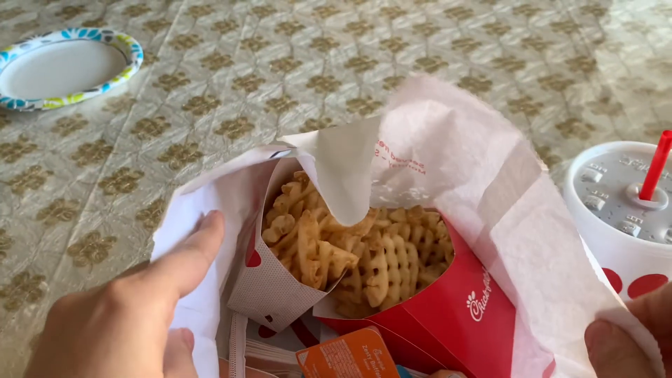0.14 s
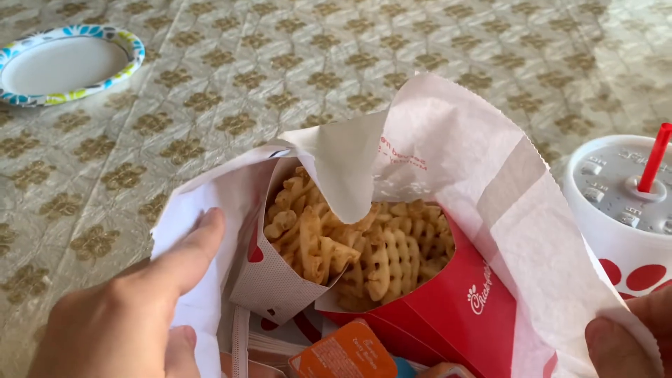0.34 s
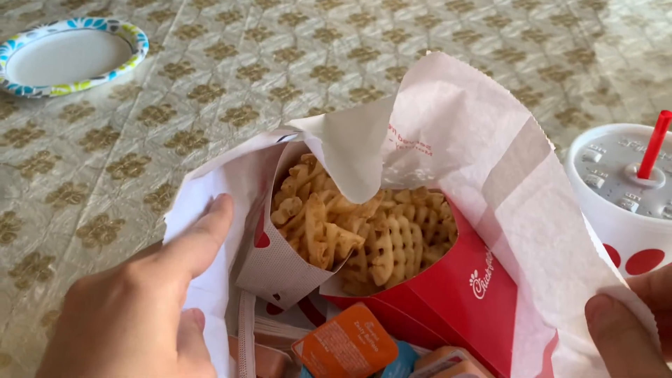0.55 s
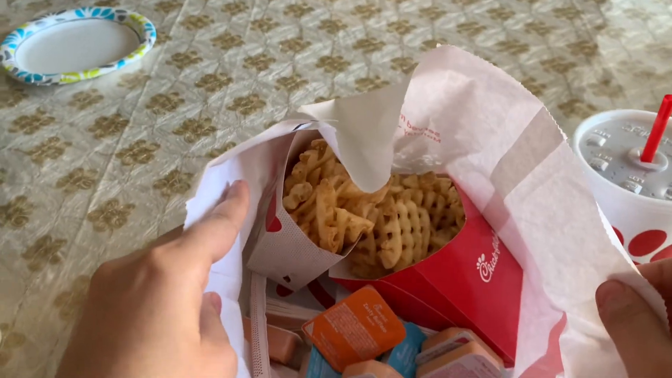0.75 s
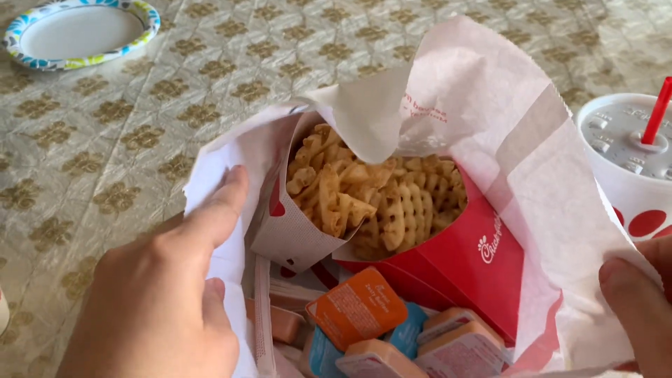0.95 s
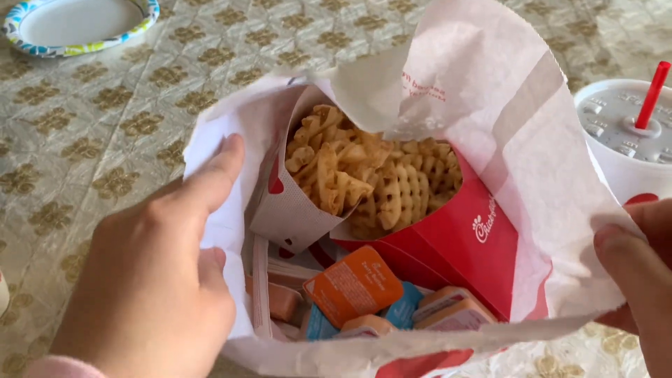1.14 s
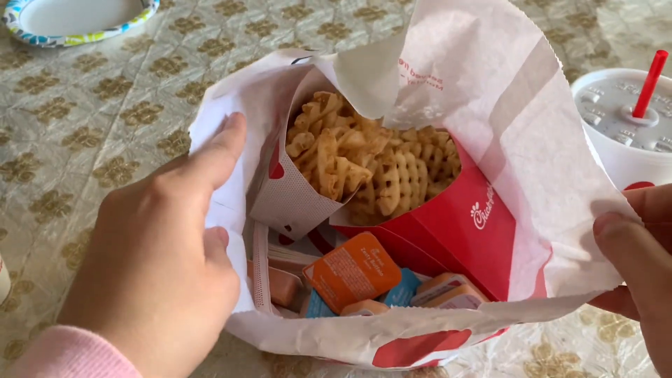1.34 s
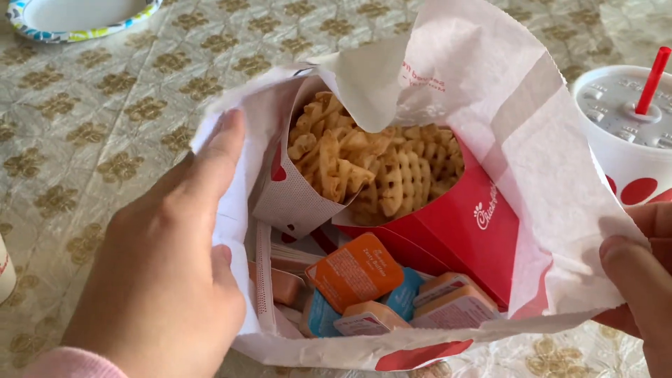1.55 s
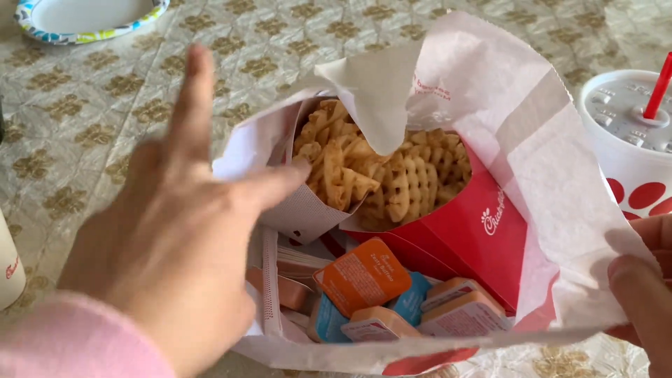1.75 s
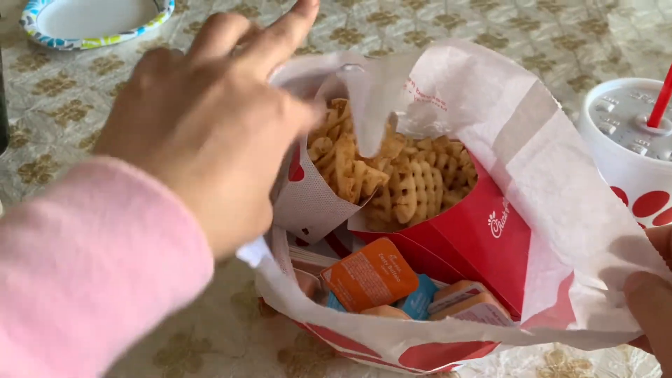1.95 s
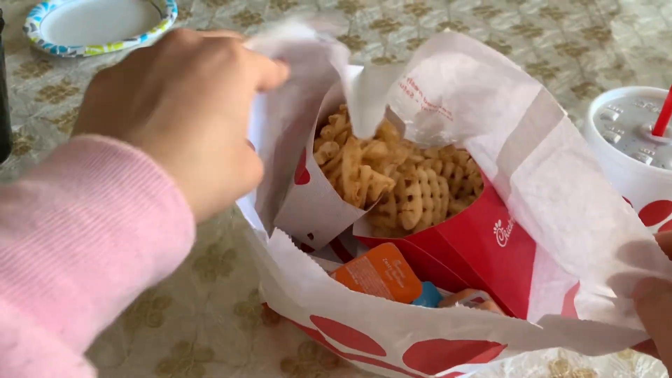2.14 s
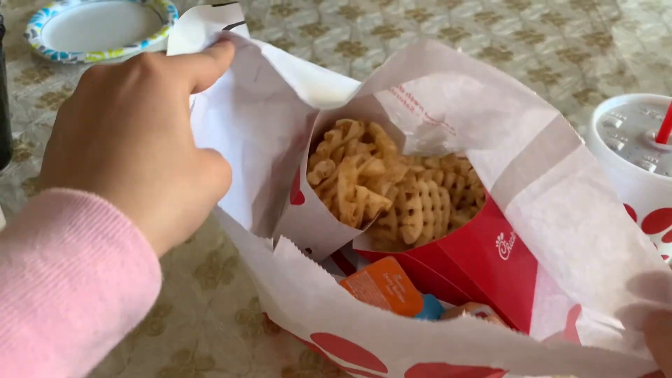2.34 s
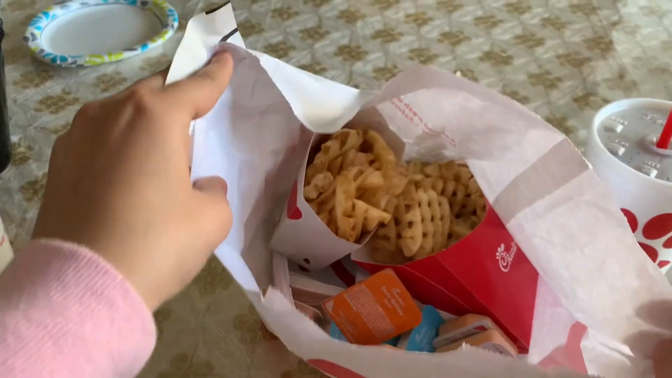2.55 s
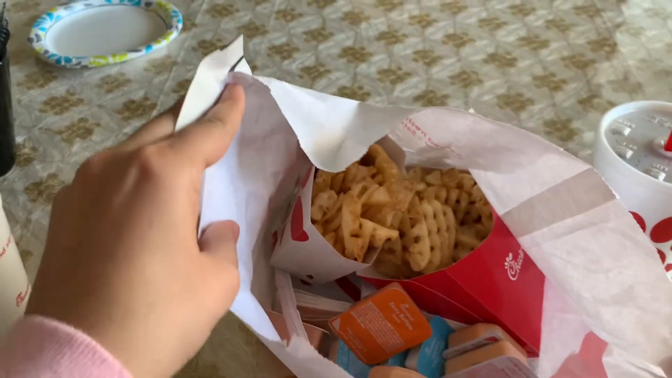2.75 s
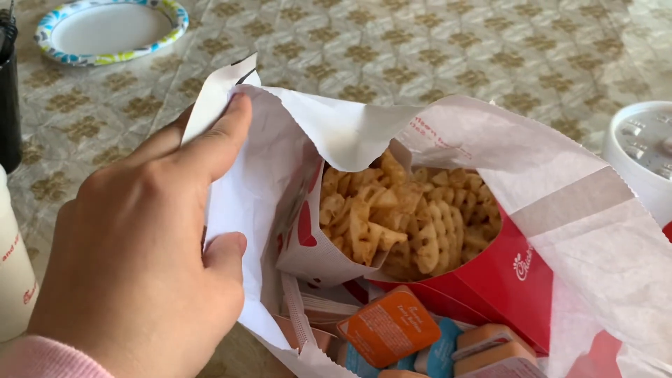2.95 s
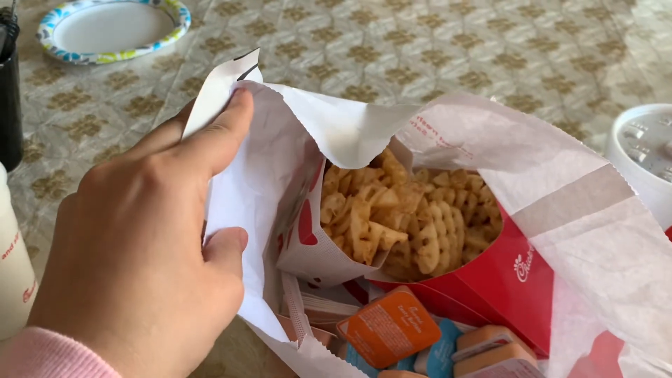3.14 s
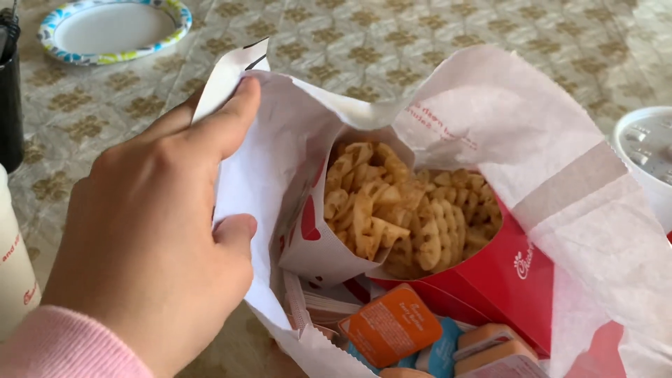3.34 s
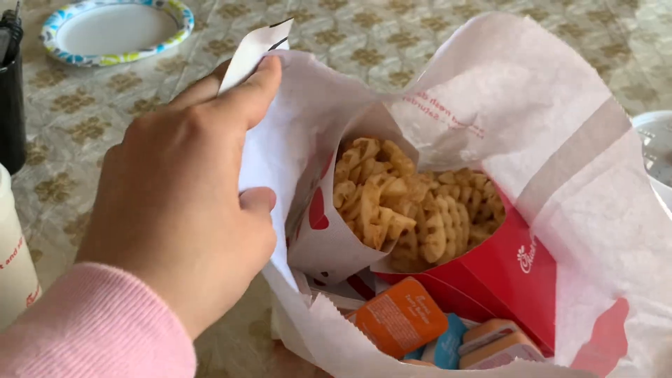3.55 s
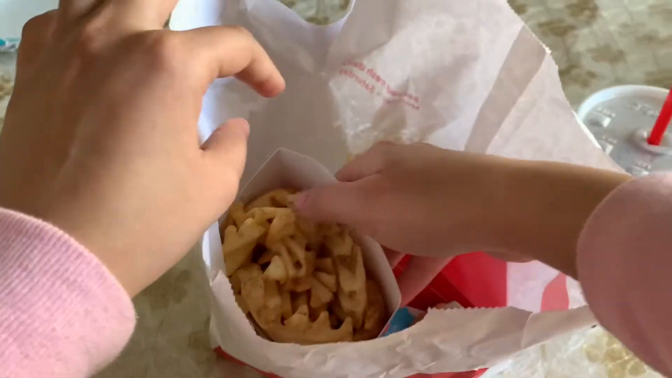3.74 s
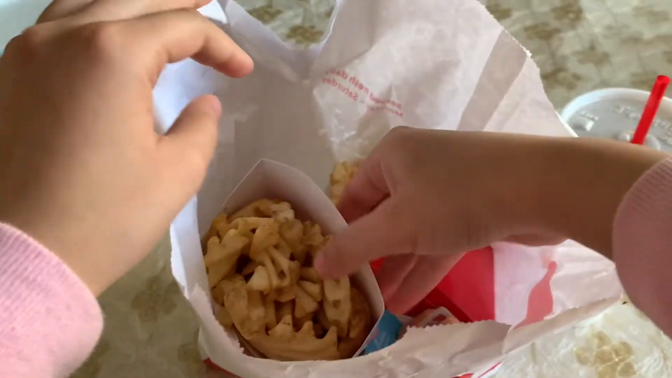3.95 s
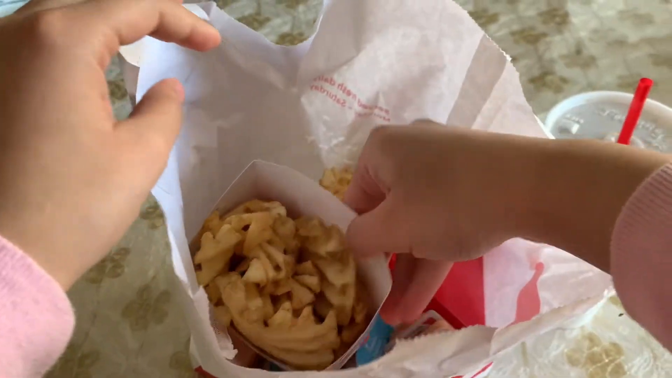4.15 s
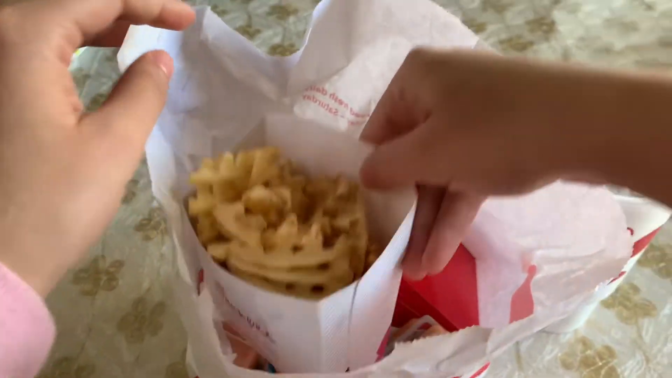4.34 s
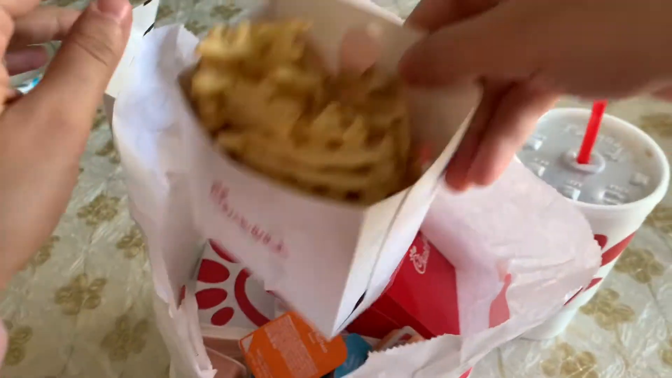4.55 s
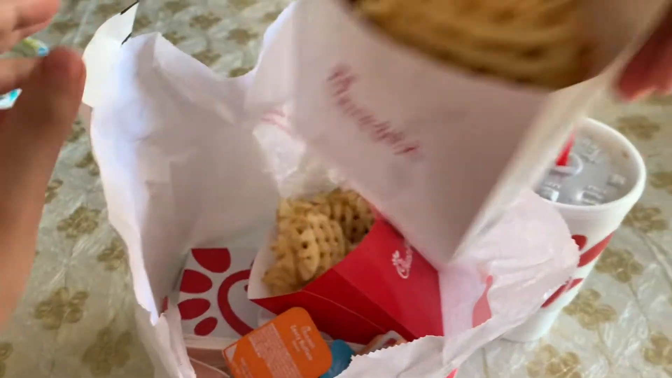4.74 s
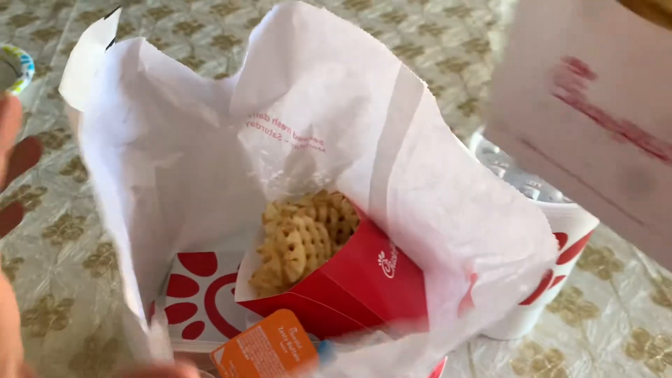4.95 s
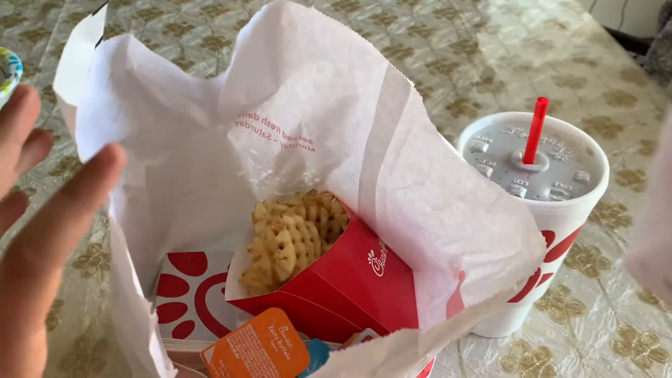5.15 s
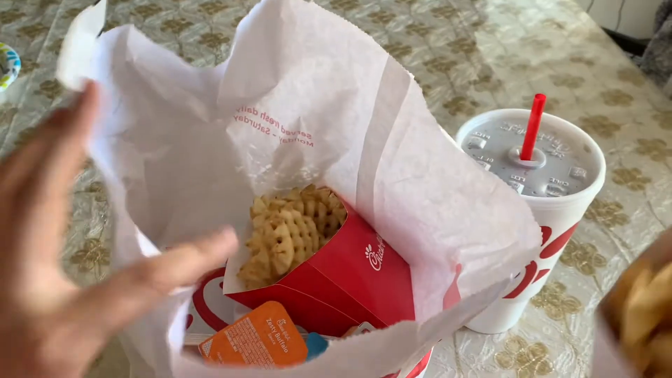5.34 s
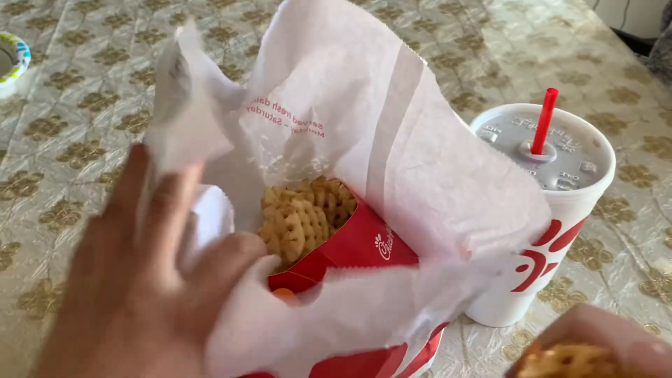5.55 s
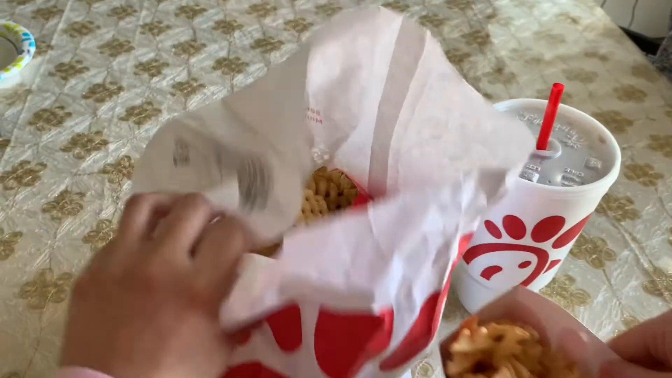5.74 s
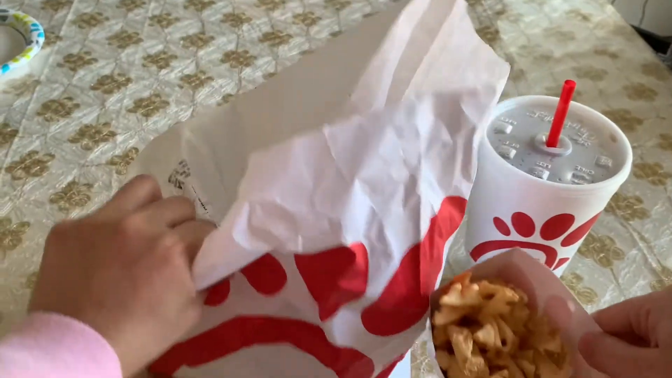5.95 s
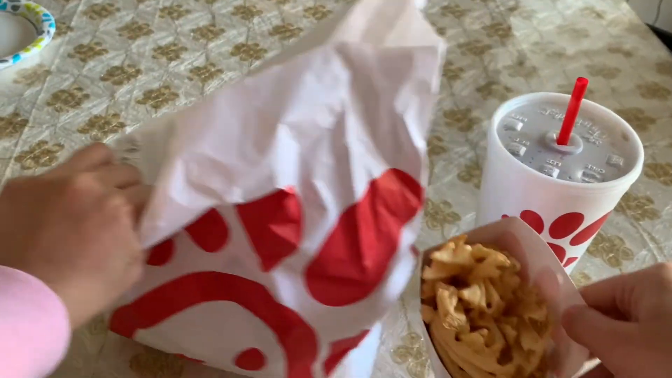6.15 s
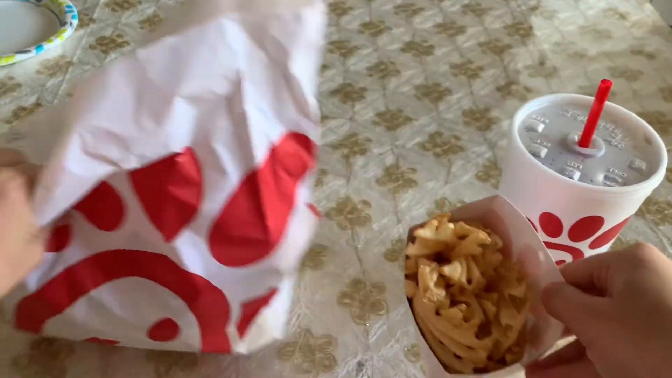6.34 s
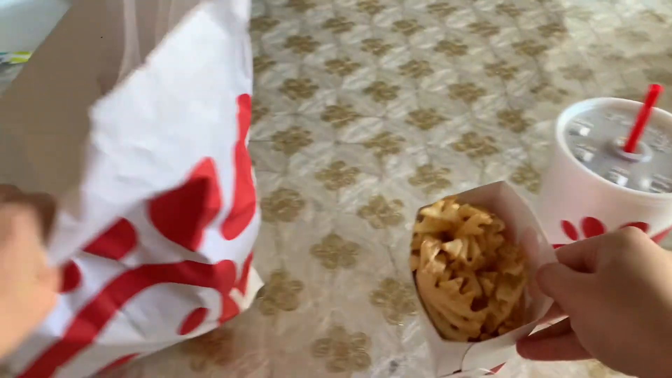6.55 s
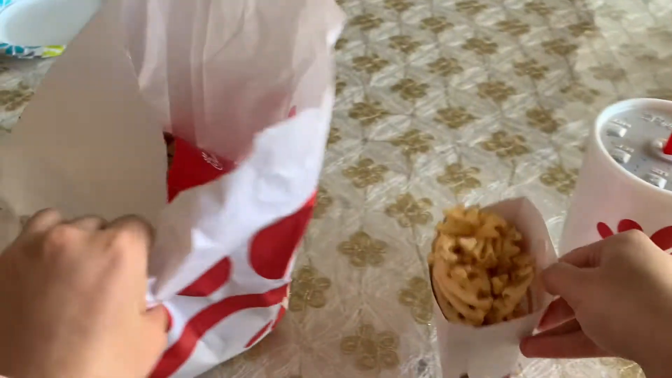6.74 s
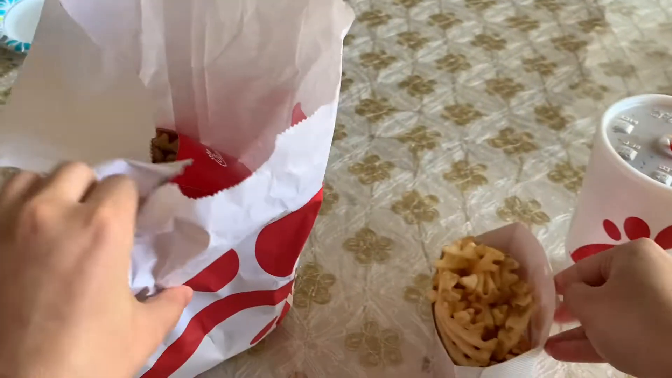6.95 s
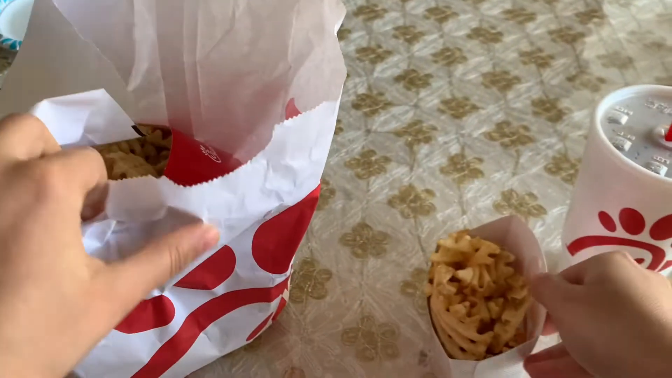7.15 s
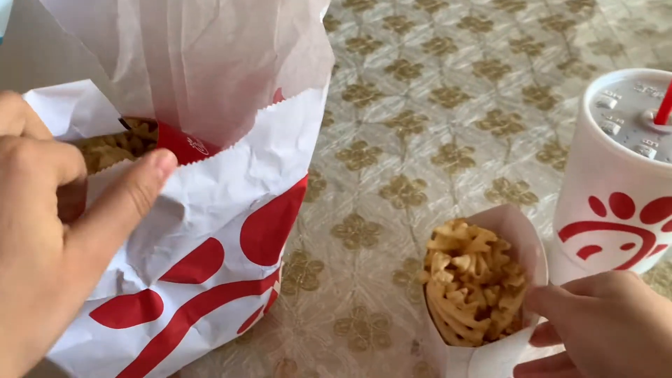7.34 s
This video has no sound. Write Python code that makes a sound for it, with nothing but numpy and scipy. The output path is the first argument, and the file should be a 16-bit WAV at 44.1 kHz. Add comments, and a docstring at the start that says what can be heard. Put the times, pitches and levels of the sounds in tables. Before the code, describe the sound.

A paper takeout bag is opened by hand, close to the microphone in a quiet, slightly reverberant room. Gentle rustling leads to a strong crackling tug, then scattered pops and rubs. A stiff carton is drawn out with a brief dull scrape and soft taps. After a lull the bag is seized and dragged, crunching and snapping loudly before easing to light rustles over faint room hum.

```python
"""A small room with a low hum, where hands open a paper takeout bag on a table close to a stereo microphone.
They slide a carton of fries out and drag the bag aside. Showers of tiny ringing cracks make the rustle,
with smooth noise for paper rubbing on paper; noise bursts and short resonances make the snaps, pops and thuds.
Resonated noise makes the carton's drag and taps; decaying noise makes the reverb, a wavering sine the hum."""
import sys
import numpy as np
from scipy import signal
from scipy.fft import rfft, irfft, next_fast_len
from scipy.io import wavfile
from scipy.ndimage import map_coordinates

SR = 44100
rng = np.random.default_rng(int(sys.argv[2]) if len(sys.argv) > 2 else 0)


def bounce(signal):
    """Save signal as a 16-bit WAV file at the path given by the first command-line argument."""
    frames = np.transpose(np.atleast_2d(signal))
    limited = np.clip(frames, -1, 1)
    pcm = np.round(limited * 32767).astype(np.int16)
    wavfile.write(sys.argv[1], SR, pcm)


N = 330309
LEAD_IN = .012  # s in which a burst may swell before its peak

# tone of flapping panels, under the rustle and under each snap: (frequency [Hz], gain [dB])
FLAP_TONE = [(25, -21), (60, 1.5), (180, -5), (350, -2), (500, -5), (700, -8.5), (1400, -11), (4000, -63.5)]


def amp(db):
    """Decibels to gain."""
    return 10 ** (np.asarray(db) / 20)


def unit(x):
    """x at rms 1."""
    return x / np.sqrt(np.mean(x ** 2) + 1e-20)


def peaked(x):
    """x with a peak of 1, taken as the mean of both rows' peaks."""
    return x / np.abs(x).max(axis=1).mean()


def along(points, hz):
    """(Hz, value) points read on a log frequency axis."""
    f, v = np.transpose(points)
    return np.interp(np.log(hz + 1), np.log(f), v)


def wobble(rate):
    """A smooth random curve, rate knots a second."""
    knots = rng.standard_normal(int(N * rate / SR) + 4)
    return map_coordinates(knots, [np.arange(N) * rate / SR])


def filtered(x, response):
    """x times a complex response of frequency."""
    m = next_fast_len(N + 8192)
    hz = np.fft.rfftfreq(m, 1 / SR)
    return irfft(rfft(x, m) * response(hz), m)[..., :N]


def coloured(x, spectrum, size=4096):
    """x through a causal minimum-phase filter with the given spectrum."""
    gain = amp(along(spectrum, np.fft.rfftfreq(size, 1 / SR)))
    cepstrum = irfft(np.log(gain))
    # folding the cepstrum onto positive time puts the energy as early as it can go
    cepstrum[1:size // 2] *= 2
    cepstrum[size // 2 + 1:] = 0
    impulse = irfft(np.exp(rfft(cepstrum)))
    return signal.fftconvolve(x, impulse[None], axes=1)[:, :x.shape[1]]


def ringing(x, hz, q):
    """x through one resonance."""
    w = 2 * np.tan(np.pi * min(hz / SR, .4))
    b, a = signal.bilinear([w / q, 0], [1, w / q, w * w])
    return signal.lfilter(b, a, x)


def burst(attack, t60, size=4096):
    """Two unrelated noises that swell up to the end of the lead-in and then die away."""
    t = np.arange(size) / SR - LEAD_IN
    swell = np.exp(np.minimum(t, 0) / attack)
    decay = amp(-60 * np.maximum(t, 0) / t60)
    return rng.standard_normal((2, size)) * swell * decay


def add(track, s, sound):
    """Lay a sound into a track at a time in seconds."""
    part = track[:, max(round(s * SR), 0):][:, :sound.shape[1]]
    part += sound[:, :part.shape[1]]


def handling():
    """Flapping and sliding levels in dB; every move swells and fades, and overlapping moves add in power."""
    # hand moves on the bag: (time of the height [s], swell [s], fade [s], flap level [dB], slide level [dB])
    hand_moves = [(0.01, .3, 0.28, -42, -52.5), (0.499, 0.37, 0.54, -47.5, -73),
                  (0.89, 0.25, 0.47, -55.5, -60), (1.5, 0.23, 0.26, -44.5, -58),
                  (1.759, 0.31, 0.53, -44.5, -47), (1.894, 0.099, .1, -31, -41.5),
                  (2.11, 0.076, 0.15, -31.5, -29.5), (2.481, 0.39, 0.39, -42, -50),
                  (3.33, 0.27, .33, -52.5, -59), (3.533, 0.2, 0.037, -38.5, -42),
                  (3.63, 0.023, 0.45, -54.5, -54), (4.058, 0.09, 0.43, -48.5, -54.5),
                  (4.345, 0.36, 0.037, -55.5, -47), (4.906, 0.016, 0.073, -35.5, -33.5),
                  (5.319, 0.054, 0.63, -45, -43.5), (5.487, 0.097, 0.036, -33, -24),
                  (5.6, 0.2, 0.36, -30.5, -33.5), (5.731, 0.1, 0.083, -25, -25),
                  (5.899, 0.17, 0.3, -24.5, -25.5), (6.429, 0.16, 0.11, -28, -36.5),
                  (6.55, 0.096, 0.11, -31, -37.5), (6.758, 0.81, 0.48, -38, -40),
                  (7.402, 0.19, 0.11, -48.5, -43.5)]
    swing_db = 20  # a move gains this much over its swell and loses it over its fade
    t = np.arange(N) / SR
    power = np.zeros((2, N))
    for s, swell, fade, flap_db, slide_db in hand_moves:
        drop_db = swing_db * np.maximum((s - t) / swell, (t - s) / fade)
        power += amp([[flap_db], [slide_db]]) ** 2 * amp(-drop_db) ** 2
    return 10 * np.log10(power + 1e-20)


def buckles(rate, low_hz, high_hz, t60, spread_db, crack, count, size):
    """Tiny buckles of uneven size, rate a second, each a noisy crack with its own few modes; rms 1."""
    draws = rng.random((int(rate * N / SR), 2 + 4 * count))
    start, strength = (draws[:, 0] * N).astype(int), draws[:, 1]
    pitch, phase = draws[:, 2:].T.reshape(2, 2, count, -1, 1).astype(np.float32)
    t = np.arange(size, dtype=np.float32) / SR
    hz = low_hz + (high_hz - low_hz) * pitch
    modes = unit(np.sin(2 * np.pi * (hz * t + phase)).sum(axis=1))
    noisy = modes + crack * rng.standard_normal(modes.shape)
    rings = noisy * (1 - np.exp(-high_hz * t)) * amp(-60 * t / t60)
    # many small ones, a few large
    rings *= amp(-spread_db * np.log(np.maximum(strength, .06)))[:, None]
    where = (start[:, None] + np.arange(size)).ravel()
    return unit(np.array([np.bincount(where, r.ravel(), N + size)[:N] for r in rings]))


def rubbed(grain, share):
    """Grain blended in power with the smooth noise of rubbing."""
    share = np.clip(share, .1, .95)
    return np.sqrt(share) * grain + np.sqrt(1 - share) * rng.standard_normal((2, N))


def rustle():
    """Moving paper: panels flap, creases crumple, and surfaces slide with a fine crinkle."""
    # tone of crumpling creases: (frequency [Hz], gain [dB])
    crumple_tone = [(300, -45), (700, -4.5), (1100, -2), (2800, 0), (4500, 0.5), (9000, -69)]
    # tone of paper sliding on paper: (frequency [Hz], gain [dB])
    slide_tone = [(1200, -23.5), (3000, 2.5), (4500, -3), (7000, 4), (11000, -2), (15500, -3.5)]
    flap_db, slide_db = handling()
    crumple_db = 0.58 * flap_db + 0.34 * slide_db  # crumpling needs both bending and sliding
    grip_db = 2.51 * wobble(40)  # the fingers move in small jerks

    panels = buckles(rate=140, low_hz=161.3, high_hz=565.4, t60=0.048,
                     spread_db=3.5, crack=1.8, count=2, size=2048)
    creases = buckles(rate=210, low_hz=662, high_hz=4575, t60=0.02,
                      spread_db=4.5, crack=1.0, count=3, size=512)
    fibres = buckles(rate=250, low_hz=1010, high_hz=15270, t60=0.016,
                     spread_db=6.0, crack=0.75, count=6, size=256)

    # hard handling buckles the paper; gentle handling rubs it more
    share = 0.85 + 0.02 * (slide_db + 42.5)
    sway = unit(coloured(rng.standard_normal((2, N)), FLAP_TONE))
    flapping = unit(unit(coloured(panels, FLAP_TONE)) + 0.38 * sway)
    crumpling = unit(coloured(rubbed(unit(creases + .5 * fibres), share), crumple_tone))
    sliding = unit(coloured(rubbed(unit(fibres + .5 * creases), share), slide_tone))

    flap = amp(flap_db - 1.5) * flapping
    crumple = amp(crumple_db - 4.5) * crumpling
    slide = amp(slide_db + 3.5) * sliding
    return amp(grip_db) * (flap + crumple + slide)


def background():
    """Low room noise, and a sine hum that wavers in pitch and comes and goes in level."""
    # rise and fall of the hum: (time [s], level [dB])
    hum_level = [(.2, -76), (.6, -50.5), (.8, -60), (4.499, -65), (4.7, -50.5), (5, -57.5)]
    # tone of the room noise: (frequency [Hz], gain [dB])
    quiet_tone = [(25, -18), (65, -0.5), (125, 1.5), (200, -7), (700, -26), (15500, -52)]
    s, db = np.transpose(hum_level)
    hum_hz = 113 + 4 * wobble(4.3)
    hum = amp(np.interp(np.arange(N) / SR, s, db)) * np.sin(2 * np.pi * np.cumsum(hum_hz) / SR)
    noise = amp(-59.0) * unit(coloured(rng.standard_normal((2, N)), quiet_tone))
    return noise + hum * np.array([[1], [0]])  # the first row reaches both ports alike


def room(x):
    """Diffuse reverberation of the first row; each frequency dies at its own speed."""
    # decay of the room: (frequency [Hz], time to fall 60 dB [s])
    room_decay = [(150, 0.56), (1450, 0.85), (2100, 0.5), (12000, 0.06)]
    hz, t, z = signal.stft(rng.standard_normal((2, SR // 2)), SR, nperseg=256)
    fading = z * amp(-60 * t / along(room_decay, hz)[:, None])
    tail = signal.istft(fading, SR, nperseg=256)[1]
    tail = np.pad(tail, ((0, 0), (SR // 200, 0)))  # the first reflections come 5 ms late
    return signal.fftconvolve(x[:1], tail / np.linalg.norm(tail[0]), axes=1)[:, :N]


def facet(push, hz, q):
    """A patch of paper rings at its main pitch and at a few chance side modes."""
    side_q, spread = 9, 0.48  # sharpness of the side modes; their scatter in log pitch
    side_hz = hz * np.exp(spread * rng.standard_normal(size=4))
    sides = sum(ringing(push, f, side_q) for f in side_hz)
    return unit(ringing(push, hz, q)) + .5 * unit(sides)


def snaps():
    """A crease cracks over a faint slower burst, its small facet rings, and the panel around it flaps."""
    # distinct snaps of creases, from faint ticks to loud cracks:
    # (time just before the snap [s], level [dB], facet pitch [Hz])
    crease_events = [(0.0754, -25.5, 11100), (0.0832, -21.5, 6100), (0.161, -23, 9700),
                     (0.2825, -36.5, 1610), (0.5019, -26.5, 1030), (0.542, -36, 1630), (0.602, -32.5, 1600),
                     (0.881, -27.5, 1080), (1.1486, -23, 6200), (1.6066, -16.5, 4840), (1.8706, -7.5, 9600),
                     (1.8789, -12, 7040), (1.929, -15, 6360), (2.05, -15, 7000), (2.0771, -3, 10800),
                     (2.1116, -11, 6500), (2.1443, -16, 4430), (2.171, -4.5, 6300), (2.2068, -14.5, 1740),
                     (2.4426, -22, 7200), (2.4654, -10.5, 9200), (2.81, -17.5, 2510), (2.8551, -23.5, 2680),
                     (3.184, -24, 7150), (3.31, -13.5, 2050), (3.3173, -19.5, 3660), (3.3978, -20.5, 2880),
                     (3.5362, -15.5, 11400), (3.62, -21.5, 4200), (3.667, -24, 9700), (4.944, -21, 7300),
                     (5.3304, -14.5, 7200), (5.4722, -8, 6500), (5.4873, -4, 6040), (5.5345, -8.5, 10900),
                     (5.5552, -11, 6950), (5.5693, -7, 6600), (5.603, -11, 6800), (5.704, -14.5, 10700),
                     (5.8515, -11.5, 7040), (5.8904, -13, 6540), (5.9045, -9, 6630), (5.9306, -7.5, 6340),
                     (5.9783, -9, 3700), (6.0177, -12, 4850), (6.0694, -12.5, 6600), (6.132, -11.5, 6250),
                     (6.1689, -16.5, 6750), (6.3861, -11.5, 7150), (6.4131, -10.5, 4330),
                     (6.4455, -13, 4940), (6.5243, -15.5, 4780), (6.568, -13.5, 5930), (6.7021, -11, 3600),
                     (6.7526, -14, 4360), (7.0184, -21, 6730), (7.1348, -17.5, 6400)]
    # tone of a snapping crease: (frequency [Hz], gain [dB])
    crease_tone = [(300, -23.5), (800, -3.5), (2000, -1), (4000, 2), (6800, 3.5), (11000, 2.5),
                   (15500, -1.5)]
    onset_shift_s = 0.001013  # constant shift from the listed time to the snap's peak
    flap_db, flap_grows = -23, 0.61  # panel flap under a snap of level 0 dB; dB of flap per dB of snap
    out = np.zeros((2, N))
    for s, db, hz in crease_events:
        crack = burst(attack=.0003, t60=.008) + amp(-22) * burst(attack=.003, t60=.02)
        ring = facet(burst(attack=0.0001, t60=0.017), hz, q=2.0)
        scatter = ringing(burst(attack=0.0046, t60=0.097), 2100, q=1.0)  # duller bounces inside the bag
        snap = amp(-1.5) * unit(crack) + unit(ring) + amp(-5.0) * unit(scatter)
        flap = burst(attack=0.0032, t60=0.11)
        start = s + onset_shift_s - LEAD_IN
        add(out, start, amp(db + 2.5) * peaked(coloured(snap, crease_tone)))
        add(out, start, amp(flap_db + flap_grows * db) * peaked(coloured(flap, FLAP_TONE)))
    return out


def pops():
    """A short push makes a stiff patch of paper or card pop or knock with a short pitch."""
    # stiff patches: (time [s], level [dB], pitch [Hz])
    stiff_patches = [(0.3597, -37.5, 1440), (0.454, -42, 1080), (1.06, -39.5, 2130), (1.384, -45, 1460),
                     (1.457, -42.5, 1420), (1.5023, -38, 790), (1.52, -30.5, 1500), (2.65, -21.5, 1850),
                     (3.841, -39.5, 1810), (5.961, -26.5, 1150)]
    out = np.zeros((2, N))
    for s, db, hz in stiff_patches:
        push = burst(attack=.0003, t60=14 / hz) + amp(-21) * burst(attack=.0005, t60=.07)
        add(out, s - LEAD_IN, amp(db + 9.0) * peaked(facet(push, hz, q=4.7)))
    return out


def thuds():
    """A soft push swings a slack panel for a few cycles, and it flops over with a low thud."""
    # slack panels: (time [s], level [dB], pitch [Hz])
    slack_panels = [(0.758, -40, 350), (0.979, -39, 285), (1.477, -38, 440), (2.209, -27, 290),
                    (2.815, -32, 230), (3.541, -34, 230), (3.63, -38.5, 110), (5.491, -20.5, 314),
                    (6.531, -22.5, 223), (6.575, -27, 218), (6.848, -31.5, 420)]
    out = np.zeros((2, N))
    for s, db, hz in slack_panels:
        push = burst(attack=.5 / hz, t60=16 / hz)
        add(out, s - LEAD_IN, amp(db + 4.5) * peaked(ringing(push, hz, q=3.3)))
    return out


def carton():
    """The carton's edge catches and slips on the paper, its walls are tapped, and its hollow body answers."""
    # the fry carton dragged up the bag wall: (time [s], level [dB])
    drag_level = [(4.167, -59), (4.182, -38.5), (4.221, -46), (4.25, -41), (4.32, -63)]
    # hollow modes of the carton: (frequency [Hz], sharpness Q [-], relative level [dB])
    hollow_modes = [(306.5, 12.6, 23.5), (566, 11.5, 13)]
    # fingers and the bag's rim tap the carton: (time [s], level [dB])
    tap_events = [(4.035, -36), (4.193, -26.5), (4.354, -36), (4.436, -38.5), (4.567, -40), (4.611, -42.5),
                  (4.647, -44.5)]

    def body(push):
        """The hollow modes ring together."""
        return unit(sum(amp(level) * ringing(push, hz, q) for hz, q, level in hollow_modes))

    def wall(push):
        """Soft card dulls each tap."""
        return unit(ringing(push, hz=433, q=1.66))

    s, db = np.transpose(drag_level)
    slips = rng.standard_normal((2, N)) * amp(2 * wobble(120))
    out = body(slips) * np.interp(np.arange(N) / SR, s, amp(db), left=0, right=0)
    for s, db in tap_events:
        push = burst(attack=0.00043, t60=0.029)
        tap = wall(wall(push) + .5 * body(push))
        add(out, s - LEAD_IN, amp(db) * peaked(tap))
    return out


def ports(pair, alike):
    """Two unrelated signals become left and right with a given likeness at each frequency."""
    def mid_side_gains(hz):
        """A likeness of 1 leaves only the mid; 0 mixes mid and side equally."""
        turn = np.arccos(np.clip(along(alike, hz), -1, 1)) / 2
        return np.array([np.cos(turn), np.sin(turn)])

    mid, side = filtered(pair, mid_side_gains)
    return np.array([mid + side, mid - side])


def scene():
    """The paper reaches the two ports out of step; the room comes from all around."""
    # phase between the microphone's ports: (frequency [Hz], lead of the left port [rad])
    port_phase = [(500, 0), (1400, .8), (2700, 3), (4300, 5.6), (6300, 5.9), (16000, -6.3)]
    # likeness of left and right in the direct sound: (frequency [Hz], likeness [-])
    direct_alike = [(400, 0.94), (900, 0.51), (5000, 0.035), (8000, 0.96)]
    room_alike = [(350, 0.87), (1200, 0.051)]  # (frequency [Hz], likeness [-])

    def lead(hz):
        """Half the phase forward on the left, half back on the right."""
        return np.exp(.5j * np.interp(hz, *np.transpose(port_phase)) * np.array([[1], [-1]]))

    paper = rustle() + snaps() + pops() + thuds() + carton()
    direct = filtered(ports(paper, direct_alike), lead)
    around = amp(-15.0) * room(paper) + background()
    return direct + ports(around, room_alike)


def record(dry):
    """The sharpest cracks are rounded off below 0.8, and the recorder cuts steeply above its band limit."""
    top_hz = 16000
    rounded = dry / (1 + np.abs(dry / .8) ** 4) ** (1 / 4)
    return filtered(rounded, lambda hz: 1 / (1 + (hz / top_hz) ** 120))


dry = scene()
out = record(dry)
bounce(out)
```